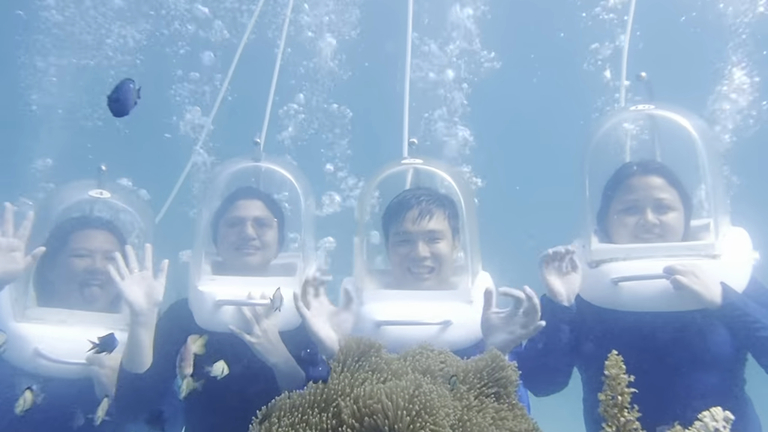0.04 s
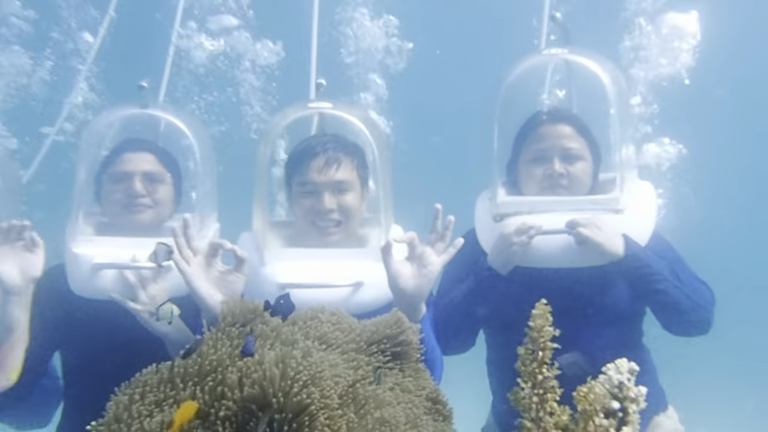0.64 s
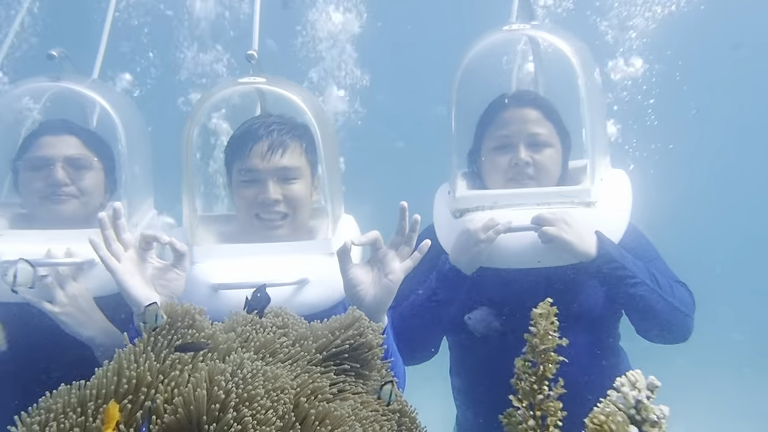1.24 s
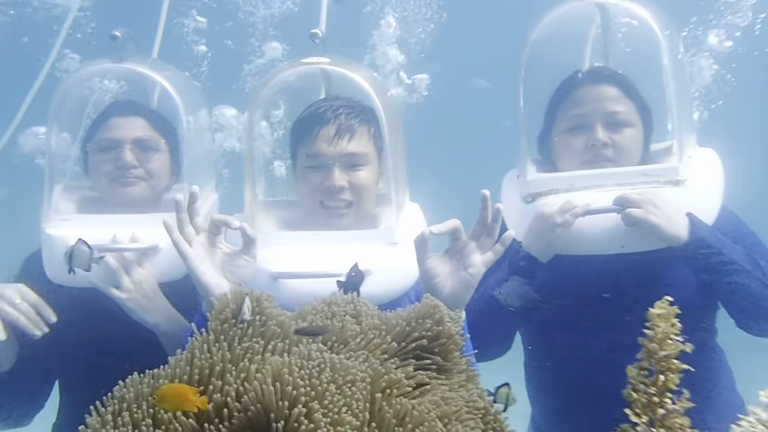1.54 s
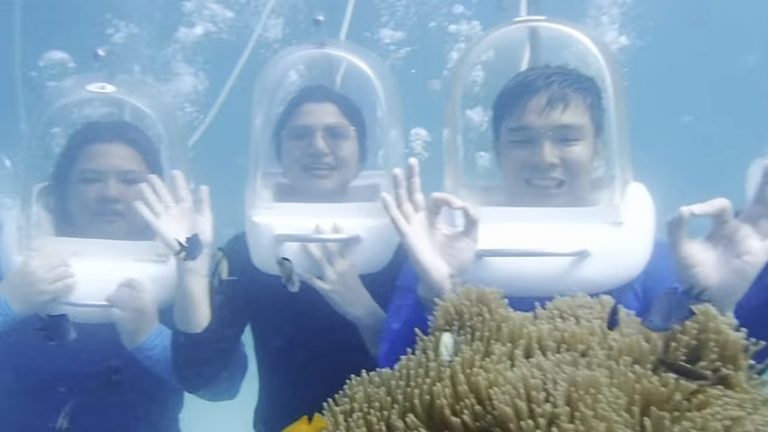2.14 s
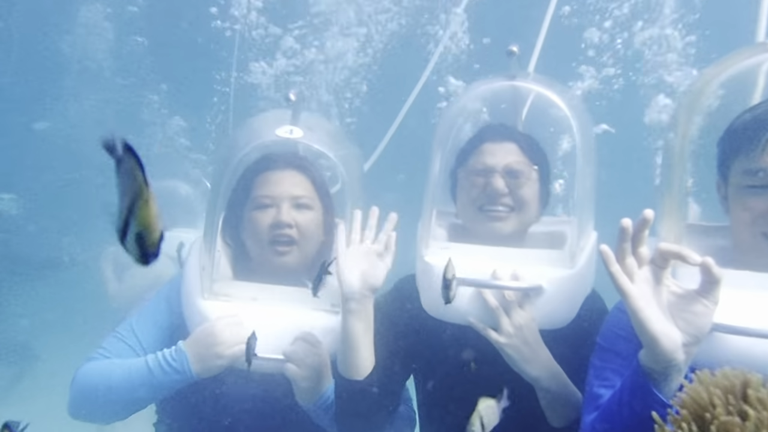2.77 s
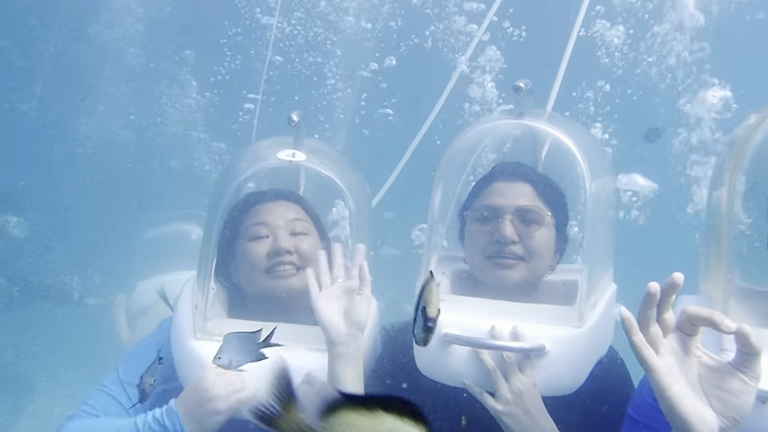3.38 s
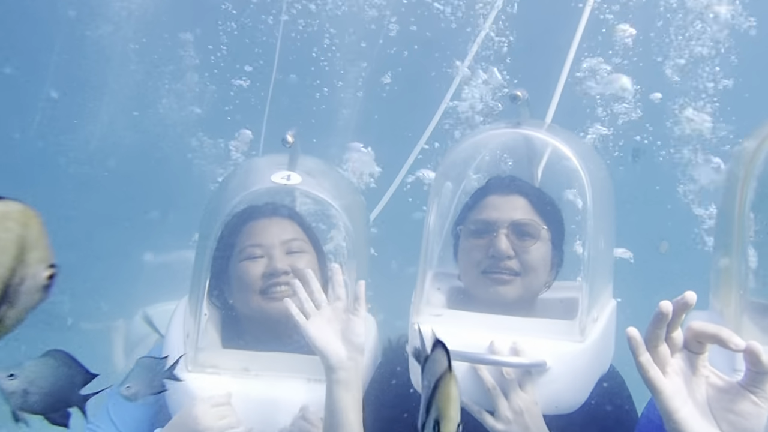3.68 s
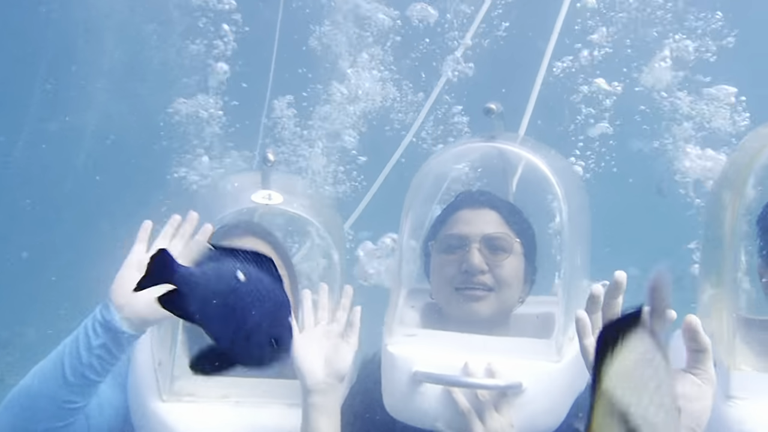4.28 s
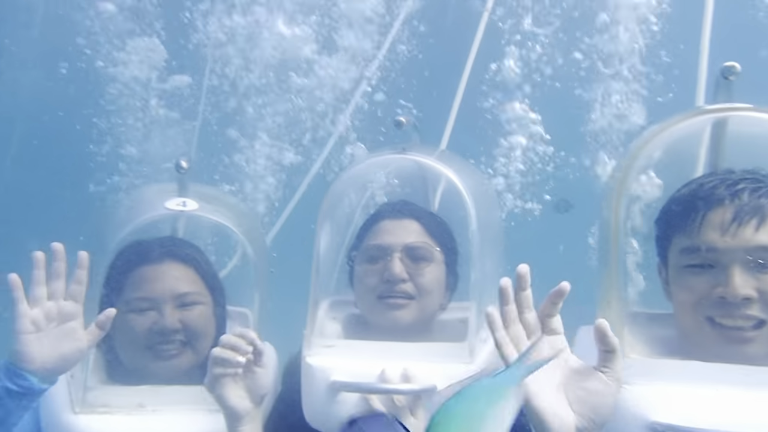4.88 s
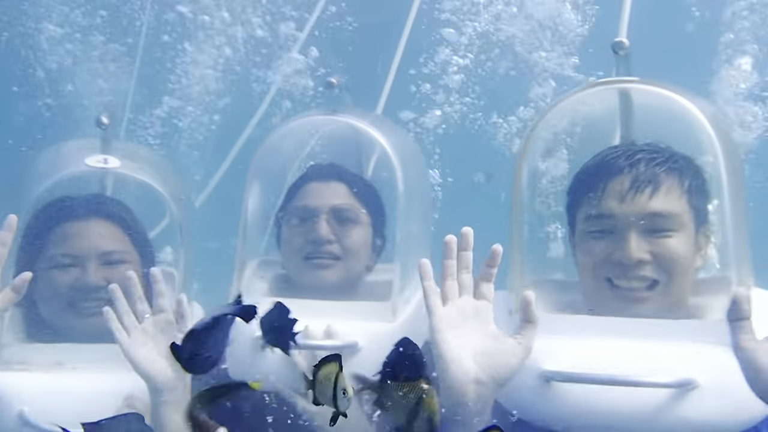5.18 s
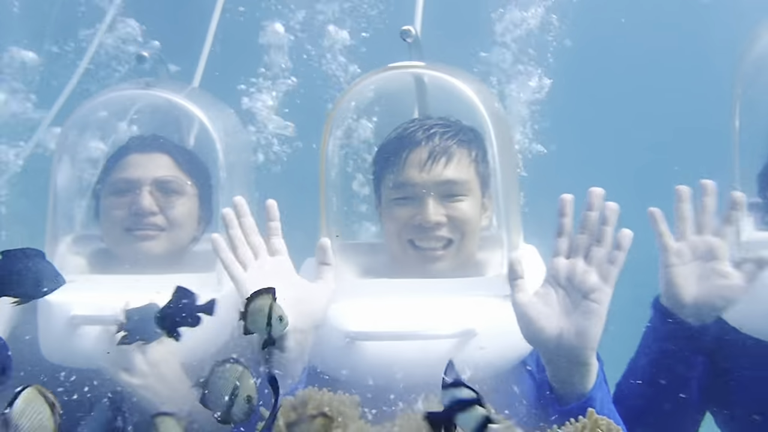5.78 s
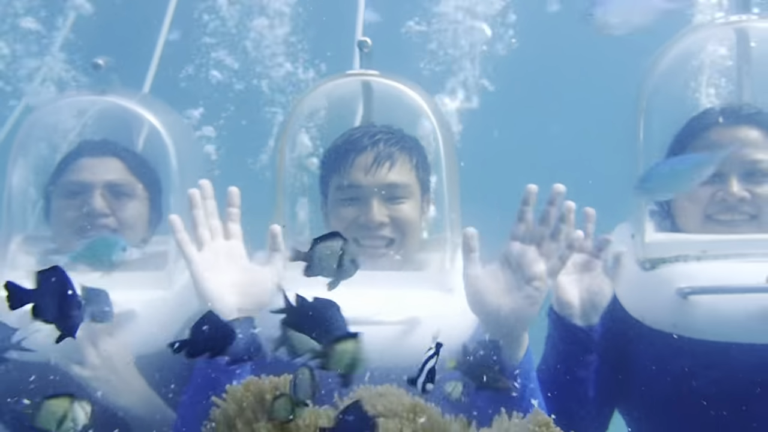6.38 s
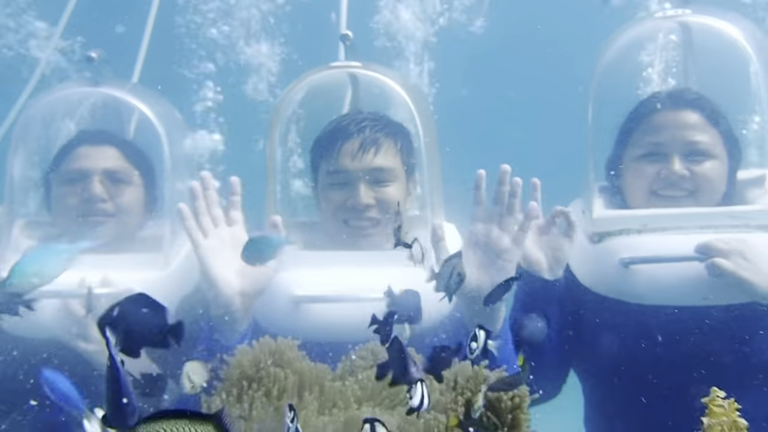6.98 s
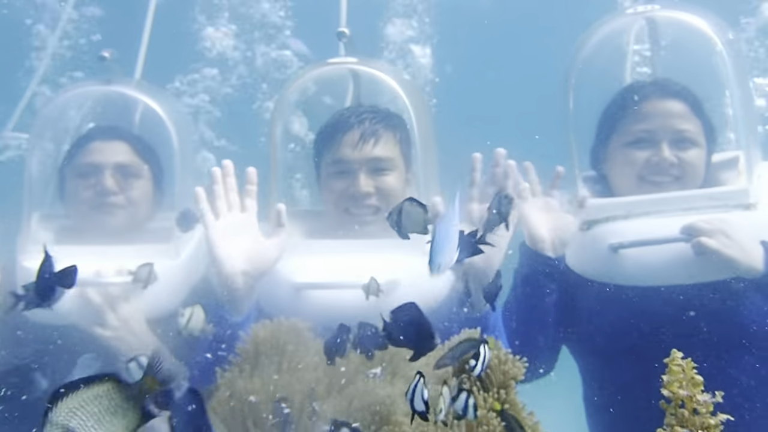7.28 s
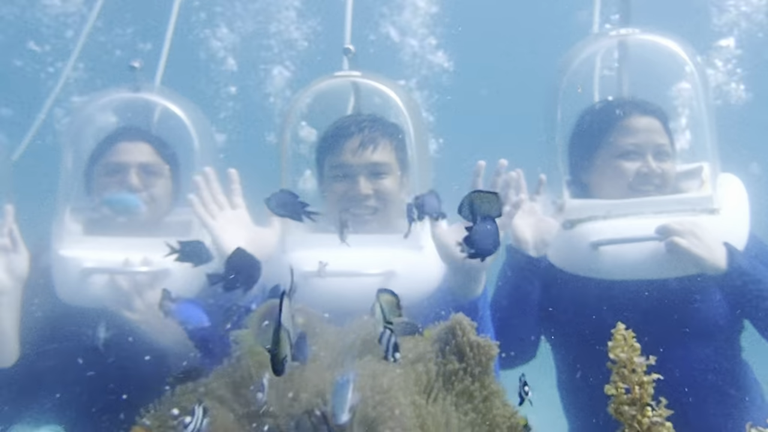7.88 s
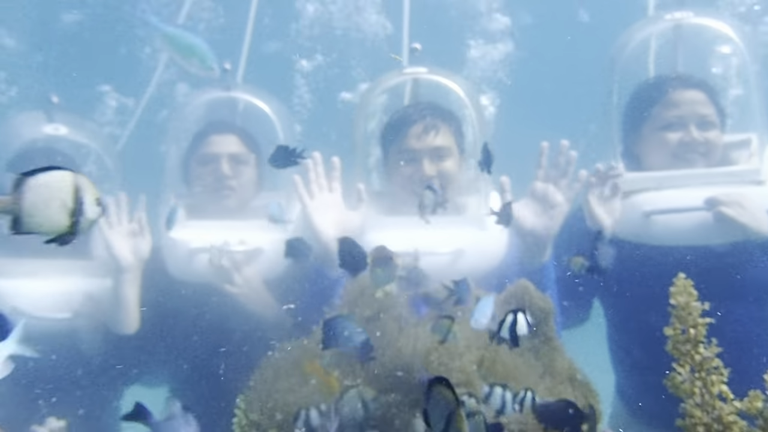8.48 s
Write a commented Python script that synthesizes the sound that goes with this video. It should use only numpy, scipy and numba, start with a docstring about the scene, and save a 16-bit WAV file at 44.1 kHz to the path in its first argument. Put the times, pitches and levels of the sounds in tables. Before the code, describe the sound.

Air streams from diving helmets on a shallow reef, a low, muffled gurgle that booms through a submerged camera's watertight housing. It surges at the start with deep glugs and dull knocks, swells again briefly, then settles. Irregular knocks keep bumping the housing, and small close bubbles plink more often toward the end. Scattered shrimp snaps, a fine fizz and a faint high whine sit behind.

```python
"""On a shallow reef, air escapes from four diving helmets, heard through a watertight camera housing.
Each bubble rings as a damped oscillator: swarms gurgle, surge twice and drive the modes of the housing,
which booms, while slugs of air glug and single bubbles plink close by. Dull knocks strike the housing.
Shrimp snap over a fine fizz, and a faint high whine comes and goes, sinking slowly for most of the time."""
import sys
import numpy as np
from scipy import signal
from scipy.fft import rfft, irfft
from scipy.io import wavfile
from scipy.ndimage import uniform_filter1d, minimum_filter1d
from numba import njit

SR = 44100
rng = np.random.default_rng(int(sys.argv[2]) if len(sys.argv) > 2 else 0)


def inscribe(sig):
    """Save sig as 16-bit PCM at rate SR to the path in sys.argv[1].

    A 1-D sig is mono; a 2-D sig holds one channel per row.
    Samples are clipped to [-1, 1] before scaling.
    """
    pcm = np.round(np.clip(np.atleast_2d(sig).T, -1, 1) * 32767)
    wavfile.write(sys.argv[1], SR, pcm.astype(np.int16))


N = 376173
TIME = np.arange(N) / SR

# wall mode of the housing: (frequency [Hz], bandwidth [Hz], gain [dB])
WALL_MODE = [(1149.5, 52.6, -1), (1134, 43, -17)]
# weaker modes of its shell: (frequency [Hz], bandwidth [Hz], gain [dB])
SHELL_MODES = [(752, 120, -4), (869, 200, -1), (1469, 91, -5), (1813, 36, -13), (1964, 48, -9.5),
               (3086, 110, -18.5)]


def undb(db):
    """Decibels to amplitude ratio."""
    return 10 ** (np.asarray(db) / 20)


def unit(x):
    """Normalisation to an rms of 1."""
    return x / np.sqrt(np.mean(x ** 2))


def curve(table):
    """Linear interpolation of (time [s], value) rows at every sample."""
    return np.interp(TIME, *np.transpose(table))


def add(out, onset, sound):
    """Superposition of a sound from its onset [s]."""
    start = max(int(onset * SR), 0)
    out[start:start + len(sound)] += sound[:N - start]


def walk(rate):
    """Random modulation of rms 1: values held for 1 / rate seconds, smoothed twice."""
    hold = int(SR / rate)
    steps = np.repeat(rng.standard_normal(N // hold + 1), hold)
    return unit(uniform_filter1d(uniform_filter1d(steps, hold), hold)[:N])


def colour(x, points, size=8192):
    """Minimum-phase filter through (frequency [Hz], gain [dB]) points, falling steeply beyond the ends."""
    hz, db = np.transpose(points)
    octave, knots = np.log2(np.fft.rfftfreq(size, 1 / SR) + 1), np.log2(hz)
    beyond = np.abs(octave - np.clip(octave, knots[0], knots[-1]))
    gain = undb(np.interp(octave, knots, db) - np.minimum(30 * beyond, 70))
    cepstrum = irfft(np.log(gain))
    cepstrum[1:size // 2] *= 2
    cepstrum[size // 2 + 1:] = 0
    return signal.fftconvolve(x, irfft(np.exp(rfft(cepstrum))))[:N]


def band(x, hz, width):
    """Second-order resonance with a gain of 1 at its centre."""
    return signal.lfilter(*signal.iirpeak(hz, hz / width, fs=SR), x)


def ring(x, modes, skirt):
    """Modal sum; a second resonance, skirt times as wide, deepens the valleys between the modes."""
    return sum(undb(db) * band(band(x, hz, width), hz, min(width * skirt, hz * 2))
               for hz, width, db in modes)


@njit
def bubbles(starts, hz, cycles, size, glide, rise):
    """Damped oscillators: each swells over rise cycles and decays 60 dB as its pitch glides up."""
    out = np.zeros(N)
    for k in range(len(starts)):
        length = int(cycles[k] * SR / hz[k])
        step = 2 * np.pi * hz[k] / SR
        phasor = size[k] + 0j
        turn = np.exp(1j * step - np.log(1000) / length)
        bend = np.exp(1j * step * glide / length)
        for i in range(starts[k], min(starts[k] + length, N)):
            out[i] += phasor.imag * min((i - starts[k]) * hz[k] / (rise * SR), 1.)
            phasor *= turn
            turn *= bend
    return out


def swarm(count, low_hz, high_hz, cycles, spread_db, glide, rise):
    """Incoherent sum, at rms 1, of bubbles random in onset, pitch, damping and strength."""
    when, pitch, persistence, strength = rng.random((count, 4)).T
    hz = low_hz * (high_hz / low_hz) ** pitch
    size = np.sqrt(hz) * undb(-spread_db * np.log(1 - .98 * strength))
    starts = (when * N).astype(np.int64)
    return unit(bubbles(starts, hz, cycles * (.5 + persistence), size, float(glide), float(rise)))


def pulsations(table, bend=0, settle_s=1):
    """Damped sinusoids that swell and decay; each starts off pitch by the fraction bend and settles."""
    out, t = np.zeros(N), TIME[:SR // 2]
    for onset, db, hz, swell, t60 in table:
        envelope = (1 - np.exp(-(t / swell) ** 2)) * np.exp(-np.log(1000) * t / t60)
        turns = hz * (t + bend * settle_s * (1 - np.exp(-t / settle_s)))
        add(out, onset, undb(db) * envelope / envelope.max() * np.sin(2 * np.pi * turns))
    return out


def gurgle():
    """Bubble resonance: big bubbles ring at low pitch, and surges of air lift their level."""
    # spectral shape: (frequency [Hz], gain [dB])
    spectrum = [(25, -39.5), (45, -22), (68, -12.5), (83, -7), (98, -4), (120, -2), (150, -1), (215, 5),
                (265, 4), (310, 5.5)]
    # surges of air: (start [s], time until release [s], lift [dB])
    surges = [(-.05, 0.16, 10), (0.17, .75, 5.5), (1.74, 0.29, 5)]
    attack_s, release_s = .025, .08
    lift_db = np.zeros(N)
    for start, hold, db in surges:
        rising = (TIME - start) / attack_s
        falling = 1 - (TIME - start - hold) / release_s
        lift_db += db * np.clip(np.minimum(rising, falling), 0, 1)
    big = swarm(count=4500, low_hz=35.3, high_hz=332.1, cycles=28.3, spread_db=1, glide=.14, rise=.32)
    return unit(colour(big, spectrum)) * undb(-30.5 + lift_db - .53 * walk(12))


def housing_resonance():
    """Forced vibration: middle-sized and small bubbles drive the modes of the housing."""
    # deep mode: (frequency [Hz], bandwidth [Hz], gain [dB])
    deep_mode = [(381.2, 56.8, 23), (418, 380, -11)]
    # envelopes of the deep, wall and upper wall modes: (time [s], level [dB])
    boom_level = [(0, -15.5), (.3, -18), (.65, -20), (.9, -23.5), (2.2, -22.5), (2.7, -26.5), (3.2, -23),
                  (4.6, -23.5), (5.1, -25), (6.05, -22), (8.53, -26.5)]
    wall_level = [(0, -43.5), (.6, -43.5), (1.55, -43), (2, -35.5), (2.45, -45.5), (2.9, -40.5),
                  (4.2, -41.5), (5.55, -38), (6.5, -41), (7.3, -43.5), (7.85, -50), (8.53, -49)]
    upper_level = [(0, -59.5), (5.5, -60), (6.4, -62), (8.3, -51.5)]
    middle = swarm(count=7000, low_hz=252, high_hz=605.5, cycles=8.06, spread_db=1.5, glide=.14, rise=.99)
    small = swarm(count=12000, low_hz=673, high_hz=3630, cycles=21.4, spread_db=-.5, glide=.07, rise=1.47)
    # the far plumes are so dense that they keep the walls ringing steadily
    plumes = swarm(count=16000, low_hz=850.5, high_hz=1738, cycles=47,
                   spread_db=-.1, glide=.035, rise=1.94)
    boom = unit(ring(middle, deep_mode, skirt=2.15)) * undb(curve(boom_level) + .5 * walk(8))
    wall = unit(ring(plumes, WALL_MODE, skirt=3.2)) * undb(curve(wall_level) + 1.3 * walk(8))
    upper_wall = unit(ring(plumes, [(1491, 69, 0)], skirt=1.8)) * undb(curve(upper_level))
    shell = unit(ring(small, SHELL_MODES, skirt=2)) * undb(-46 + 1.5 * walk(10))
    return boom + wall + upper_wall + shell


def antiresonance(sound):
    """Destructive interference: the modes of the housing cancel at a few frequencies."""
    # notches: (frequency [Hz], bandwidth [Hz], depth [0-1])
    nulls = [(670, 99, 0.8), (974, 84, 0.8), (1310, 71, 0.54)]
    for hz, width, depth in nulls:
        sound = sound - depth * band(sound, hz, width)
    return sound


def knocks():
    """Impact excitation: a longer contact rings the deep mode longer and rattles the higher ones less."""
    # blows on the housing: (time [s], peak level [dB], frequency [Hz], contact time [s])
    blows = [(.056, -3.5, 343, 0.0042), (.086, 1, 400.6, 0.011), (.181, -2.5, 383, 0.0067),
             (.238, -9, 373.5, 0.027), (0.279, -9.5, 379, .012), (.721, 0.5, 376, 0.0082),
             (.742, -9.5, 378, 0.019), (1.355, -14, 395, .012), (2.911, -15, 388, 0.009),
             (3.07, -11, 390, 0.0082), (3.207, -14.5, 394, 0.0055), (3.392, -10.5, 389, 0.0098),
             (3.588, -11.5, 392, 0.0051), (3.806, -9.5, 362, 0.0074), (3.902, -8.5, 401, 0.0058),
             (3.946, -9.5, 400, 0.0097), (4.455, -9, 392.4, 0.021), (4.735, -8.5, 385, 0.0039),
             (4.944, -3.5, 381, 0.0023), (5.247, -14.5, 392, 0.0038), (5.527, -8.5, 412, 0.004),
             (5.574, -17.5, 394, 0.005), (5.873, -10, 375.4, 0.0063), (6.741, -16, 397, .005),
             (6.918, -6.5, 399, 0.008), (7.137, -17, 391, 0.014), (7.326, -13, 371, 0.0095),
             (7.452, -11, 359, 0.0043), (7.545, -14, 335, 0.0023), (7.736, -9.5, 368.4, 0.013),
             (8.325, -13, 366, .006), (8.376, -11, 447, 0.0055)]
    base_t60_s, ring_per_contact = .062, 2.45
    firm_contact_s, db_per_doubling = .004, -4.5
    swings, jolts = [], []
    for onset, db, hz, contact in blows:
        swings.append((onset, db, hz, contact, base_t60_s + ring_per_contact * contact))
        jolt_db = db - 1 + db_per_doubling * np.log2(contact / firm_contact_s)
        jolts.append((onset, jolt_db, hz, .002, .03))
    thump = pulsations(swings, bend=.033, settle_s=.0028)
    bursts = np.abs(pulsations(jolts)) * rng.standard_normal(N)
    rattle = ring(bursts, SHELL_MODES + WALL_MODE, skirt=5.5)
    return thump + colour(rattle, [(400, 2.5), (700, -3), (1500, -6.5), (3500, -6.5)])


def glugs():
    """Free oscillation of big slugs of air, which swell slowly and rise in pitch."""
    # slugs: (time [s], peak level [dB], frequency [Hz], 60 dB decay time [s])
    slugs = [(0, -5.5, 197, 0.04), (0.025, -8, 190, 0.097), (.185, -18.5, 232.1, 0.69),
             (.31, -20, 120, 0.37), (.415, -14.5, 213.5, 0.28), (.425, -25.5, 119.5, .4),
             (.565, -17, 180, 0.13), (0.721, -6, 195, 0.053), (0.849, -20.5, 193.3, 0.34),
             (1.754, -14, 190, 0.072), (1.87, -24, 87.4, 0.31), (1.9, -24, 232, 0.1),
             (2.726, -16, 199, 0.2), (4.219, -14, 244, 0.1)]
    swell_share = .066
    tones = [(onset, db, hz, swell_share * t60, t60) for onset, db, hz, t60 in slugs]
    return pulsations(tones, bend=-.12, settle_s=.0068)


def plinks():
    """Free oscillation of small close bubbles, which splutter briefly as they tear loose."""
    # bubbles: (time [s], peak level [dB], frequency [Hz], 60 dB decay time [s])
    close = [(0.142, -19, 1103, 0.058), (.457, -34, 705, .19), (.571, -37, 803, 0.23),
             (1.852, -39, 2900, .024), (2.032, -30, 1122, 0.073), (2.669, -28, 1117, 0.11),
             (3.028, -34, 750, 0.1), (3.524, -41.5, 1680, .039), (3.899, -44, 2450, 0.027),
             (4.456, -36, 920, 0.27), (5.189, -42, 3580, .025), (5.869, -35, 610, .046),
             (6.16, -33.5, 780, 0.13), (6.315, -29, 705, 0.04), (6.333, -26.5, 1750, .042),
             (6.339, -29, 877, 0.12), (6.79, -32, 556, 0.079), (6.927, -27.5, 568, .14),
             (7.01, -28, 1100, 0.024), (7.084, -36, 854, .05), (7.153, -30, 1144, .07),
             (7.228, -23.5, 1054, 0.11), (7.231, -34, 594, 0.16), (7.278, -35.5, 785, 0.092),
             (7.546, -34, 914, 0.031), (7.61, -21, 1084, 0.03), (7.904, -39, 1740, .11),
             (8.377, -24, 747, 0.18), (8.487, -35.5, 1800, .03)]
    swell_cycles, splutter_swell_s, splutter_t60_s = 2.6, .006, .068
    tones = [(onset, db, hz, swell_cycles / hz, t60) for onset, db, hz, t60 in close]
    tearing = [(onset, db - 17.5, hz, splutter_swell_s, splutter_t60_s) for onset, db, hz, _ in close]
    return pulsations(tones, bend=.05, settle_s=.0095) + pulsations(tearing) * walk(450)


def shrimp():
    """Impulse and response: each snap cracks, scatters off the reef and draws a thud from the housing."""
    # snaps, before filtering: (time [s], crack level [dB], thud level [dB])
    snaps = [(.3122, -25.5, -36), (0.5707, -18, -27.5), (2.0667, -27, -26.5), (2.6857, -27, -40),
             (3.2964, -27, -29), (3.6325, -23, -18), (3.7475, -24, -13), (4.4902, -29, -25),
             (4.6023, -24, -36), (4.8895, -17, -23), (5.6362, -29, -22), (6.334, -32, -24),
             (6.3973, -26, -28), (6.8992, -24.5, -21), (7.359, -29, -35), (7.9319, -26, -30),
             (8.4912, -23.5, -37)]
    # transmission of the crack through the housing: (frequency [Hz], gain [dB])
    crack_spectrum = [(2000, -4.5), (5500, 1), (8000, 6), (11000, -1), (15800, -1.5)]
    thud_spectrum = [(900, -20), (1500, 11), (2300, -9), (3300, -7), (4300, -18), (5500, -30)]
    crack_s, scatter_s = .0006, .0087
    crack, thud, t = np.zeros(N), np.zeros(N), TIME[:SR // 30]
    envelope = np.exp(-t / crack_s) + .15 * np.exp(-t / scatter_s)
    for onset, crack_db, thud_db in snaps:
        burst = rng.standard_normal(len(t)) * envelope
        add(crack, onset, burst * undb(crack_db))
        add(thud, onset, burst * undb(thud_db))
    return colour(crack, crack_spectrum), colour(thud, thud_spectrum)


def fizz(crack):
    """Transmission: hiss, tiny bubbles, far shrimp and near cracks reach each microphone differently."""
    # paths through the housing, in phase and in antiphase: (frequency [Hz], gain [dB])
    mid_path = [(1800, -6), (2500, -15), (3300, -8), (4000, -14.5), (4700, -9), (6400, -13), (7200, -9),
                (7650, -2), (8500, -8.5), (9200, -17.5), (10000, -12.5), (10800, -14.5), (13000, -15),
                (15800, -17.5)]
    side_path = [(1900, -50), (2200, -8), (2900, -12), (3300, -13), (4000, -22), (4500, -6.5), (5200, -3.5),
                 (6400, -8), (7600, -8.5), (8500, -5), (9200, -16), (10400, -13.5), (12000, -15.5),
                 (15800, -13)]
    # high modes that the fizz rings: (frequency [Hz], bandwidth [Hz], gain [dB])
    high_modes = [(2890, 130, 0), (3100, 170, 4), (4250, 160, -1), (4730, 100, 2), (5370, 260, -3.5),
                  (5840, 320, -1)]
    # envelopes of the fizz and of those modes: (time [s], level [dB])
    fizz_level = [(0, -1.5), (.6, -0.5), (4, 0), (7, -0.3), (7.8, 1), (8.5, 1)]
    hollow_level = [(0, -77.5), (1.4, -65), (2.3, -60), (4, -63.5), (6.1, -65.5), (8.53, -59.5)]
    tiny = swarm(count=6000, low_hz=2400, high_hz=9000, cycles=35, spread_db=3.6, glide=.06, rise=3)
    far_shrimp = swarm(count=160, low_hz=4000, high_hz=12000, cycles=3, spread_db=3, glide=0, rise=.1)
    swell = undb(curve(fizz_level) + .5 * walk(1.93) + .5 * walk(25))
    hiss = undb(-41) * rng.standard_normal(N)
    mid = swell * (hiss + undb(-51) * tiny) + undb(-57) * far_shrimp + crack
    side = undb(-41.5) * swell * rng.standard_normal(N) + undb(-4) * crack
    hollow_gain = undb(curve(hollow_level) + 2 * walk(3.15))
    drive = undb(-5) * tiny + rng.standard_normal(N)
    hollow = hollow_gain * unit(ring(drive, high_modes, skirt=1.2))
    return colour(mid, mid_path) + hollow + np.array([[1], [-1]]) * colour(side, side_path)


def whine():
    """Harmonic series: partials 5 to 12 of a wavering tone that sinks slowly, then partly recovers."""
    # absent fundamental: (time [s], frequency [Hz])
    pitch = [(0, 983), (2.2, 972), (3.8, 963), (5.6, 934), (8.53, 954)]
    # partials 5 to 11: (harmonic number, relative level [dB])
    harmonics = [(5, -10), (6, -15), (7, -9), (8, 0.5), (9, -15), (10, -12.5), (11, -20.5)]
    # envelopes of those partials and of the twelfth, which emerges late: (time [s], level [dB])
    level = [(0, -67), (.9, -59), (1.5, -66), (2.1, -51), (3.1, -64), (3.75, -53), (4.3, -64), (6, -59),
             (7.2, -59.5), (7.8, -51), (8.3, -66)]
    twelfth_level = [(0, -75), (4, -70), (6.3, -62), (7.2, -67), (7.45, -58), (8.53, -59)]
    waver_hz, drift_hz, flutter_db = 1.8, 1.1, 1.5
    hz = curve(pitch) + waver_hz * walk(90) + drift_hz * walk(3.3)
    phase = 2 * np.pi * np.cumsum(hz) / SR
    partials = sum(undb(db + flutter_db * walk(16)) * np.sin(k * phase) for k, db in harmonics)
    twelfth = undb(curve(twelfth_level) + flutter_db * walk(17)) * np.sin(12 * phase)
    return undb(curve(level)) * partials + twelfth


def housing_flex():
    """Uneven flexure of the housing: a faint low noise in antiphase at the two microphones."""
    # spectral shape: (frequency [Hz], gain [dB])
    spectrum = [(60, -0.5), (160, 1), (215, 7.5), (290, -1), (390, 4), (600, -6.5), (1200, -9),
                (1800, -25.5)]
    flex = undb(-53.5) * unit(colour(rng.standard_normal(N), spectrum))
    return np.array([-flex, flex])


def lean(pair):
    """Modal coupling: the housing favours one microphone or the other, depending on frequency."""
    # balance: (frequency [Hz], left minus right level [dB])
    balance = [(180, 0), (240, -1), (680, -0.46), (800, 1.7), (900, -0.8), (1150, 0), (1250, 5), (1400, 0),
               (2080, 0), (2280, -5), (2750, 3.5), (3100, -3), (3500, 1), (4350, 2), (4700, -4.5),
               (5200, 2.3), (5900, 2.5), (6700, -3), (7300, 0), (8400, -3), (9400, 0), (15000, 0.5)]
    tip_db = np.interp(np.fft.rfftfreq(N, 1 / SR), *np.transpose(balance))
    return irfft(rfft(pair) * undb(np.array([tip_db, -tip_db]) / 2), N)


def scene():
    """Superposition: bubbles and knocks reach both microphones nearly alike; fizz and whine are wide."""
    crack, thud = shrimp()
    streams = antiresonance(gurgle() + housing_resonance())
    centre = streams + knocks() + glugs() + plinks() + thud
    return lean(centre + housing_flex() + fizz(crack) + np.array([whine(), whine()]))


def record(dry):
    """Peak limiting: the camera eases its gain down around the highest peaks, then cuts the top."""
    ceiling, cutoff_hz = .86, 15800
    allowed = ceiling / np.maximum(np.abs(dry).max(axis=0), ceiling)
    gain = uniform_filter1d(minimum_filter1d(allowed, size=601), size=601)
    return signal.sosfilt(signal.ellip(10, .2, 80, cutoff_hz, fs=SR, output="sos"), dry * gain)


dry = scene()
out = record(dry)
inscribe(out)
```